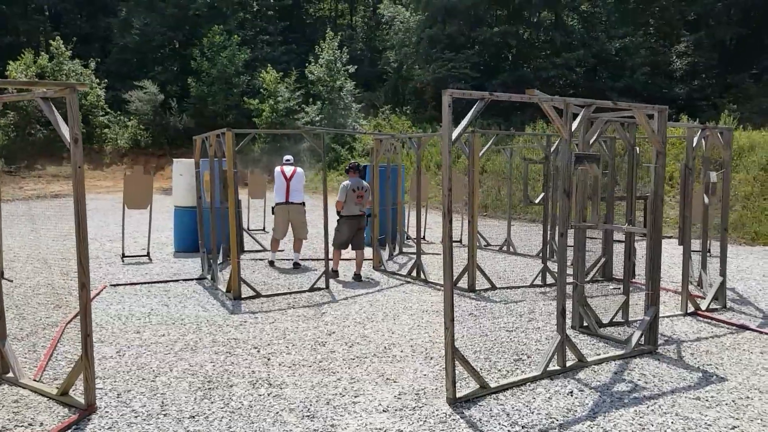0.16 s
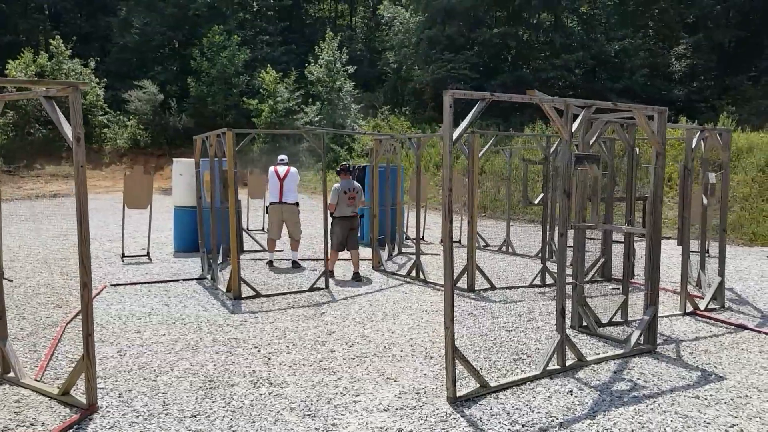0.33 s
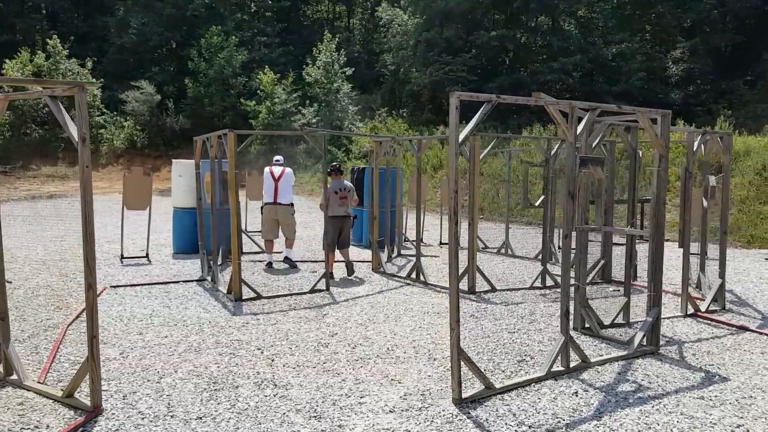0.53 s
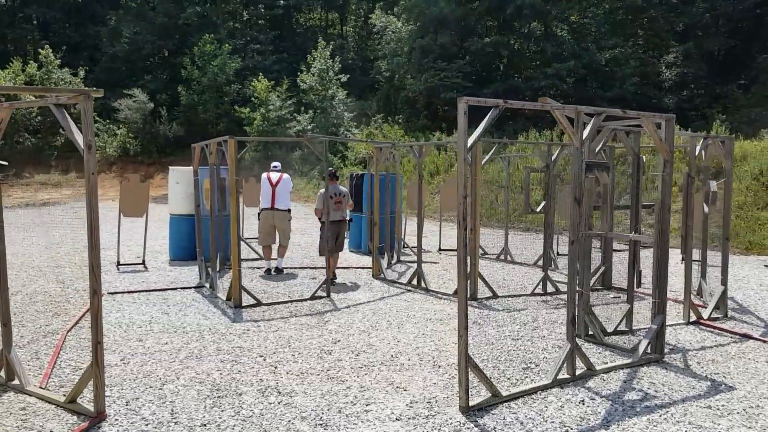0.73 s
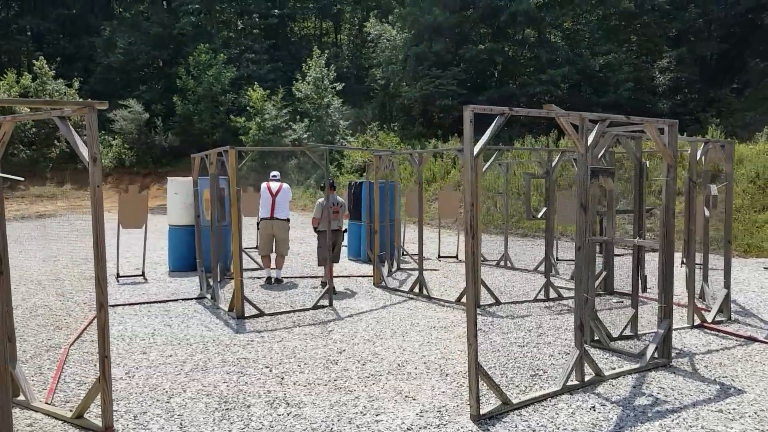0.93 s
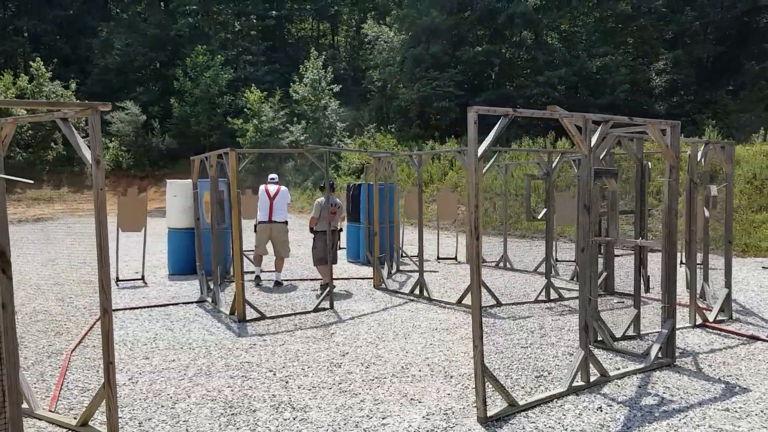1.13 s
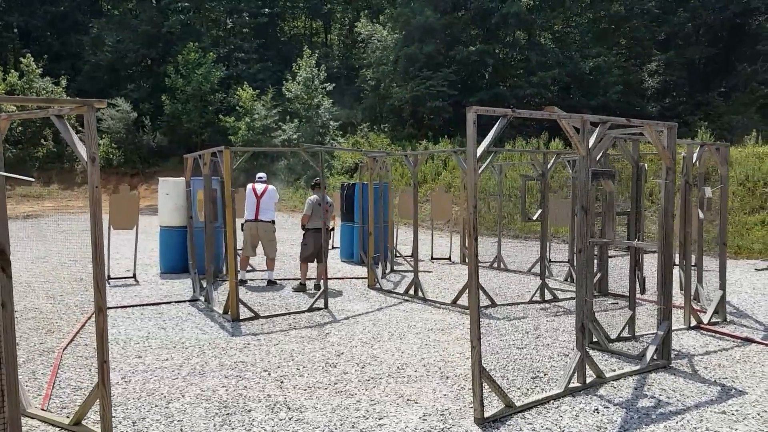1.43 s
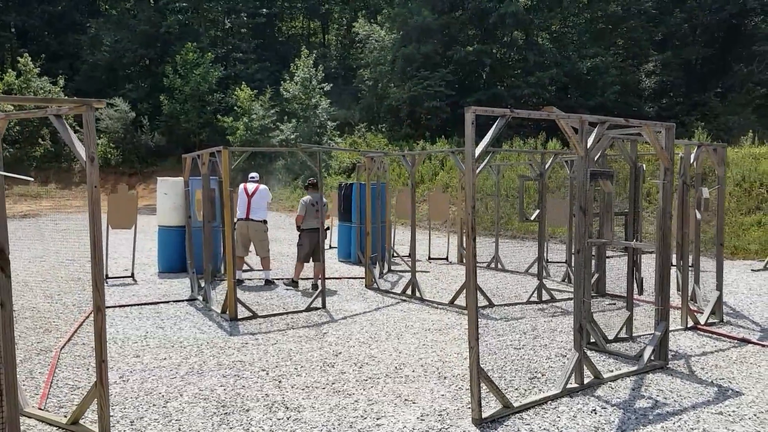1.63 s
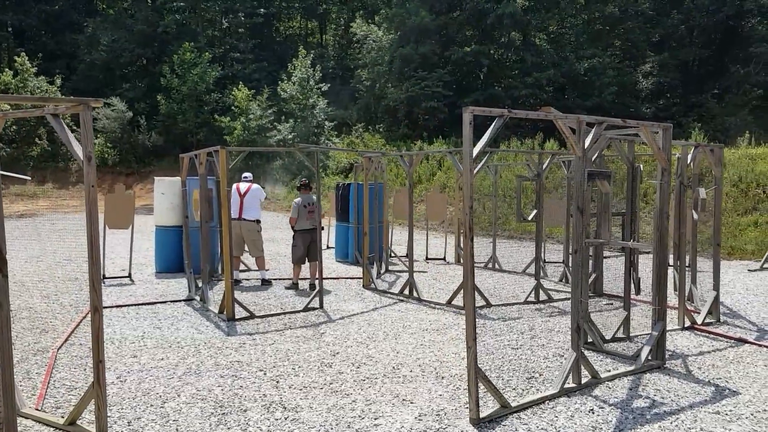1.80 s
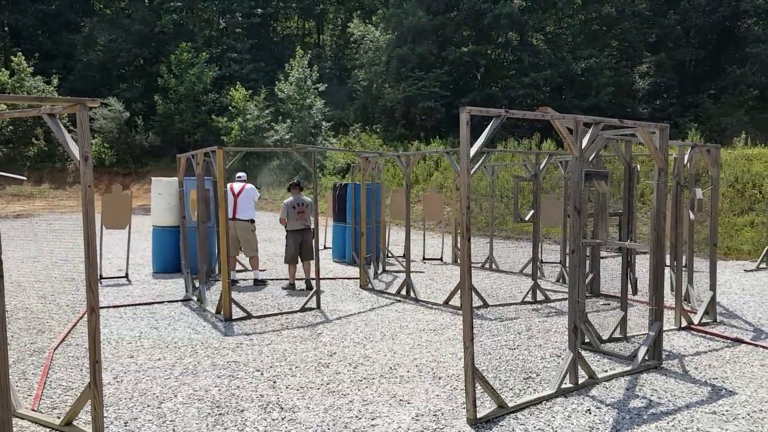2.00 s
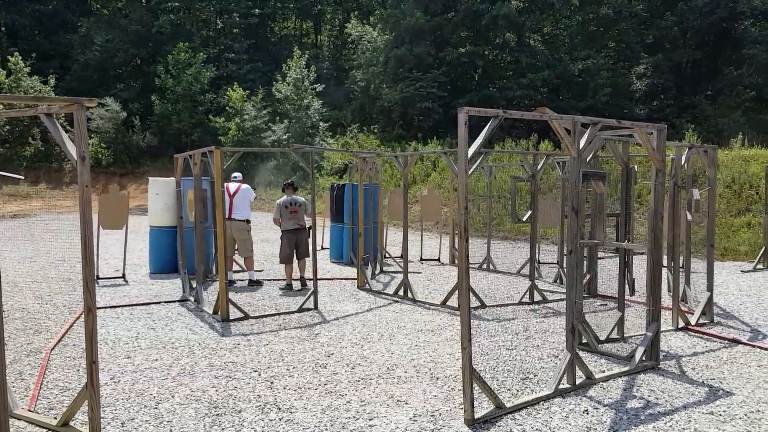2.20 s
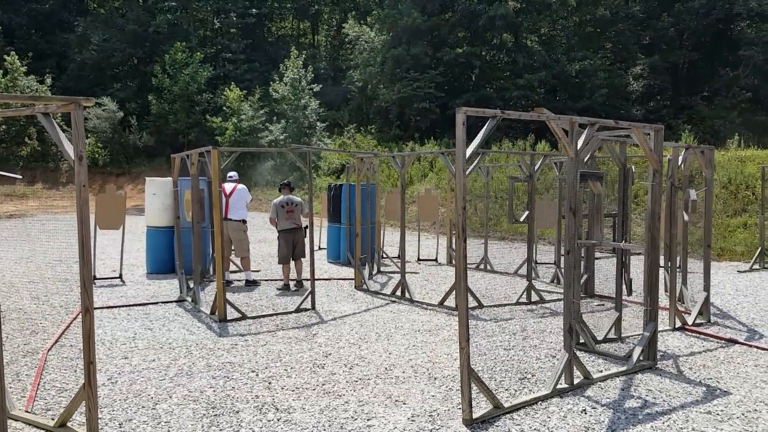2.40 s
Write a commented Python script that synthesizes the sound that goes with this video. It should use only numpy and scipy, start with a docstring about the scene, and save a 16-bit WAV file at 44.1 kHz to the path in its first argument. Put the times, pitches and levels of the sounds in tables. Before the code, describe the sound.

Pistol shots at an outdoor gravel range, heard in stereo from about ten metres behind. A faint earlier echo lingers, then loud cracks come at 0.2, 0.8, 1.4, 1.9 and 2.2 seconds, the last two a quick pair. Each has a short low thump, crackly microphone overload, a dull boom, and a rolling echo with distinct slaps from bank and trees, over faint outdoor wash.

```python
"""Outdoor range, gravel bay, some ten metres behind a pistol shooter, in stereo.
The echo of an earlier shot still hangs in a faint outdoor wash; then five shots follow within about two seconds.
Each starts with a noise blast and a low swinging thump, with crackling spikes from the overloaded microphone.
The sides of the bay answer with a dull boom; the earth bank and the tree line return a rolling echo of
fading noise, with a few distinct slaps in it."""
import sys
import numpy as np
from scipy import signal
from scipy.fft import rfft, irfft, next_fast_len
from scipy.io import wavfile

SR = 44100
rng = np.random.default_rng(int(sys.argv[2]) if len(sys.argv) > 2 else 0)


def bounce(signal):
    """Save signal as a 16-bit WAV file at the path given by the first command-line argument."""
    frames = np.transpose(np.atleast_2d(signal))
    limited = np.clip(frames, -1, 1)
    pcm = np.round(limited * 32767).astype(np.int16)
    wavfile.write(sys.argv[1], SR, pcm)


N = 112454
FFT_SIZE = 2 * next_fast_len(N // 2 + 1, True)
BLAST_ATTACK_S = 0.0022  # shared by the blast and its crackle

# Likeness of left and right in the echoes and the air. Each row: frequency in Hz, correlation.
ECHO_LIKENESS = [(150, 1), (380, 0.88), (700, 0.85), (1300, 0), (4000, 0.062)]


def undb(db):
    """Decibels to gain."""
    return 10 ** (np.asarray(db) / 20)


def curve(points, hz):
    """Read a table on a log-frequency axis."""
    table_hz, values = np.array(points, float).T
    return np.interp(np.log(hz + 1e-3), np.log(table_hz), values)


def freqs():
    """Frequencies of the spectrum's bins in Hz."""
    return np.arange(FFT_SIZE // 2 + 1) * SR / FFT_SIZE


def noise(likeness):
    """White stereo noise whose two sides agree by the given amount at each frequency."""
    correlation = np.clip(curve(likeness, freqs()), -.99, .99)
    mid, side = rfft(rng.standard_normal((2, FFT_SIZE)))
    mid = mid * np.sqrt((1 + correlation) / 2)
    side = side * np.sqrt((1 - correlation) / 2)
    return irfft(np.array([mid + side, mid - side]))[:, :N]


def colour(x, db):
    """Causal filter with the given relative dB per bin; white noise keeps its power."""
    gain = undb(db)
    # folding the cepstrum forward gives minimum phase, so nothing sounds ahead of its onset
    cepstrum = irfft(np.log(gain / np.sqrt(np.mean(gain ** 2))))
    cepstrum[1:FFT_SIZE // 2] *= 2
    cepstrum[FFT_SIZE // 2 + 1:] = 0
    response = irfft(np.exp(rfft(cepstrum)))[:4096]
    return signal.fftconvolve(x, response[None], axes=1)[:, :N]


def release(t, hold, t60):
    """Full level through the hold, then an exponential fall of 60 dB per t60."""
    return np.exp(-np.log(1000) * np.maximum(t - hold, 0) / t60)


def envelope(t, attack, hold, t60):
    """Linear rise, hold and exponential release, all in seconds."""
    return np.clip(t / attack, 0, 1) * release(t, hold, t60)


def fade(x, t, hold, t60s):
    """After the hold, every octave dies away at its own rate."""
    centres = 62.5 * 2. ** np.arange(9)
    place = np.interp(np.log(freqs() + 1), np.log(centres), np.arange(len(centres)))
    spectrum = rfft(x, FFT_SIZE)
    faded = 0
    for k, hz in enumerate(centres):
        # overlapping triangular bands that add up to the whole
        band = irfft(spectrum * np.maximum(1 - abs(place - k), 0))[:, :N]
        faded = faded + band * release(t, hold, curve(t60s, hz))
    return faded


def grain(depth_db, size):
    """Uneven strength, gliding to a new random level every size samples; mean power 1."""
    levels = rng.standard_normal(N // size + 2)
    gain = undb(depth_db * np.interp(np.arange(N) / size, np.arange(N // size + 2), levels))
    return gain / np.sqrt(np.mean(gain ** 2))


def blast(t, treble_db, rings):
    """The muzzle blast: dense near reflections favouring a few bands, which shift as the shooter
    moves, then plain scatter from the gravel."""
    # Blast spectrum. Each row: frequency in Hz, relative level in dB per Hz.
    blast_spectrum = [(30, -20.5), (120, -20.5), (250, -4.5), (400, -8.5), (560, 3.5), (850, 2), (1300, 2),
                      (2000, -2), (2500, -6.5), (3150, -6.5), (5000, -15), (7300, -21), (9200, -17),
                      (15500, -31.5)]
    # Likeness of left and right. Each row: frequency in Hz, correlation.
    blast_likeness = [(60, 0.48), (150, 0.26), (350, 0.87), (680, 0.68), (1300, 0.15), (3000, 0.13),
                      (6000, -0.042)]
    # Decay of the scatter. Each row: frequency in Hz, time to fall 60 dB in seconds.
    blast_t60 = [(60, 0.11), (250, 0.16), (600, 0.26), (1500, 0.21), (4000, 0.3), (14000, 0.34)]
    level_db, hold_s, grain_db = -8, 0.011, 1.5
    near_db = 2.5  # first reflections over the later scatter
    ring_width_hz, ring_lasts_s, ring_fade_s = 39, 0.026, 0.017

    hz = freqs()
    db = curve(blast_spectrum, hz) + treble_db * hz / (hz + 2500)
    lift = sum(lift_db / (1 + ((hz - ring_hz) / ring_width_hz) ** 2) for ring_hz, lift_db in rings)
    scatter = noise(blast_likeness) * grain(grain_db, size=70) * np.clip(t / BLAST_ATTACK_S, 0, 1)
    scatter = fade(scatter, t, hold_s, blast_t60)
    near = .5 - .5 * np.tanh((t - ring_lasts_s) / ring_fade_s)
    first = undb(near_db) * colour(scatter * near, db + lift)
    later = colour(scatter * (1 - near), db)
    return undb(level_db) * (first + later)


def thump(t, hz):
    """The expanding gas gives a low push that swings a few times."""
    level_db, attack_s, hold_s, t60_s = -20, 0.006, 0.01, 0.037
    side_lag_s = 0.0014  # the second channel hears it later
    age = np.array([t, t - side_lag_s])
    swing = np.sin(2 * np.pi * hz * age)
    return undb(level_db) * swing * envelope(age, attack_s, hold_s, t60_s)


def crackle(t):
    """The overloaded microphone crackles: random single spikes in each channel, dying away with the blast."""
    # Spike spectrum. Each row: frequency in Hz, relative level in dB.
    crackle_spectrum = [(300, -6), (2000, -43), (5000, -10.5), (10000, -12.5), (16000, -10)]
    level_db, spikes_per_s, hold_s, t60_s = -8.5, 880, 0.0037, 0.02
    share = spikes_per_s / SR
    hits = rng.random((2, N)) < share
    spikes = hits * rng.choice([-1, 1], (2, N)) / np.sqrt(share)
    burst = spikes * envelope(t, BLAST_ATTACK_S, hold_s, t60_s)
    return undb(level_db) * colour(burst, curve(crackle_spectrum, freqs()))


def boom(t, pattern):
    """The sides of the bay return a dull boom right behind the blast."""
    # Boom spectrum. Each row: frequency in Hz, relative level in dB per Hz.
    boom_spectrum = [(40, -16), (110, -11), (200, -3.5), (300, 2), (480, 4), (700, -6.5), (1500, -28.5)]
    level_db, attack_s, hold_s, t60_s = -24.5, 0.033, 0.062, 0.18
    wave = pattern * envelope(t, attack_s, hold_s, t60_s)
    return undb(level_db) * colour(wave, curve(boom_spectrum, freqs()))


def slaps(t, pattern):
    """Flat faces far off send back short dull bursts."""
    # Distinct returns. Each row: delay after the shot in seconds, level in dB.
    distinct_returns = [(.170, -26.5), (.193, -32.5), (0.2171, -29.5), (0.2283, -20.5), (.251, -35),
                        (0.288, -30)]
    # Slap spectrum. Each row: frequency in Hz, relative level in dB per Hz.
    slap_spectrum = [(100, -33), (350, -16), (580, 9.5), (800, 7.5), (1250, -3.5), (2500, -8.5),
                     (5000, -18), (15000, -39)]
    attack_s, hold_s, t60_s = .0015, .004, .03
    bursts = sum(undb(db) * envelope(t - delay, attack_s, hold_s, t60_s) for delay, db in distinct_returns)
    return colour(pattern * bursts, curve(slap_spectrum, freqs()))


def echo(t, pattern):
    """Bank and trees roll the shot back, each octave dying at its own rate."""
    # Echo spectrum. Each row: frequency in Hz, relative level in dB per Hz.
    echo_spectrum = [(25, -36), (60, -36), (120, -14), (180, -11.5), (270, -7), (380, -11), (610, 0),
                     (860, -9), (1100, -4), (1700, -10), (2350, -14.5), (3000, -13), (6500, -23.5),
                     (9500, -25.5), (13000, -33), (15500, -42)]
    # Decay of the echo. Each row: frequency in Hz, time to fall 60 dB in seconds.
    echo_t60 = [(100, 0.85), (230, 0.27), (650, 1.4), (2000, 1.38), (5000, 1), (9000, .85), (14000, 0.45)]
    level_db, grain_db, early_db = -29.5, 0.94, -16
    # the echo swells at the bank and fades beyond the trees
    bank_s, bank_spread_s, trees_s = 0.14, 0.0056, 0.27
    swell = .5 + .5 * np.tanh((t - bank_s) / bank_spread_s)
    early = undb(early_db) * np.clip(t / bank_s, 0, 1)
    roll = undb(level_db) * (swell + early * (1 - swell)) * grain(grain_db, size=200)
    return colour(fade(pattern * roll, t, trees_s, echo_t60), curve(echo_spectrum, freqs()))


def terrain(site, start):
    """The same ground reflects every shot, so the pattern repeats; moving air reshuffles its treble."""
    # Share of the pattern's power that repeats. Each row: frequency in Hz, share from 0 to 1.
    sameness = [(300, 0.64), (700, 0.46), (1300, 0.79), (3000, .12), (8000, 0.05)]
    same = np.clip(curve(sameness, freqs()), 0, 1)
    kept = rfft(np.roll(site, int(start * SR), axis=1), FFT_SIZE)
    fresh = rfft(noise(ECHO_LIKENESS), FFT_SIZE)
    return irfft(kept * np.sqrt(same) + fresh * np.sqrt(1 - same))[:, :N]


def air():
    """Faint outdoor wash of the range: steady coloured noise, slightly uneven."""
    # Air spectrum. Each row: frequency in Hz, relative level in dB per Hz.
    air_spectrum = [(25, -52), (60, -32), (110, -19), (210, -22.5), (480, -3), (680, -4), (1200, -11.5),
                    (2600, -18), (5000, -42), (10000, -36), (15500, -55)]
    level_db = -42
    wash = noise(ECHO_LIKENESS) * grain(0.55, size=2000)
    return undb(level_db) * colour(wash, curve(air_spectrum, freqs()))


def scene():
    """The shots and their echoes over the outdoor air."""
    # The shots. Each row: start in seconds, level of blast and crackle in dB, thump trim in dB,
    # thump pitch in Hz, treble tilt in dB, trim of all returns in dB, and three rings of the
    # first reflections, each a frequency in Hz and a lift in dB.
    shots = [(0.2058, 2.5, 1, 131, 2.5, -0.21, [(716, 4.5), (1312, -1), (1712, -8)]),
             (.8310, -1, -0.5, 155, 1.1, 0.059, [(656, 6), (1092, 0.5), (1302, 1)]),
             (1.3712, -2, -9, 166, 4.7, -0.52, [(546, 9), (932, 1.5), (1432, 7)]),
             (1.9337, -1.57, 4.7, 137, 1.5, -0.9, [(785, 7), (1222, 8), (1502, 7.5)]),
             (2.2205, -1.5, 1, 129, 7, -0.54, [(611, 4.5), (1212, 1.5), (1478, 8.5)])]
    earlier_s, earlier_db = -0.58, 4.5  # only its echo is still in the air
    t = np.arange(N) / SR
    bay, faces = noise(ECHO_LIKENESS), noise(ECHO_LIKENESS)
    out = air() + undb(earlier_db) * echo(t - earlier_s, terrain(bay, earlier_s))
    for start, db, thump_db, thump_hz, treble_db, echo_db, rings in shots:
        age = t - start
        report = blast(age, treble_db, rings) + crackle(age)
        push = thump(age, thump_hz)
        pattern = terrain(bay, start)
        returns = boom(age, pattern) + echo(age, pattern) + slaps(age, terrain(faces, start))
        out = out + undb(db) * report + undb(thump_db) * push + undb(echo_db) * returns
    return out


def record(dry):
    """The recorder flattens the loudest peaks and cuts the top."""
    knee, top_hz = 7, 15750  # a higher knee bends later and harder
    squashed = dry / (1 + abs(dry) ** knee) ** (1 / knee)
    low_pass = signal.ellip(8, .2, 70, top_hz, fs=SR, output="sos")
    return np.clip(signal.sosfilt(low_pass, squashed), -1, 1)


dry = scene()
out = record(dry)
bounce(out)
```